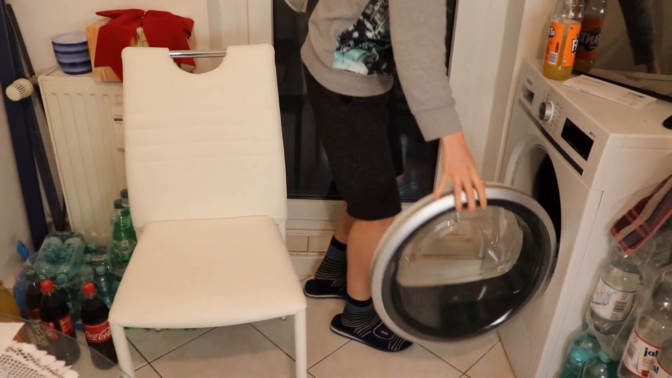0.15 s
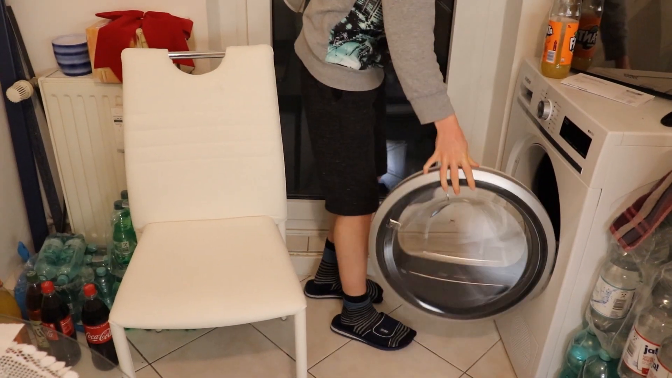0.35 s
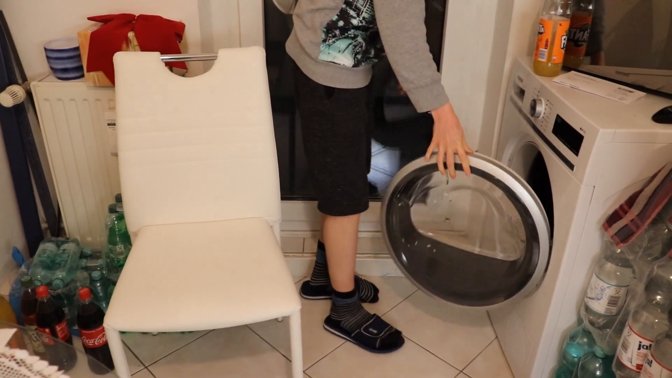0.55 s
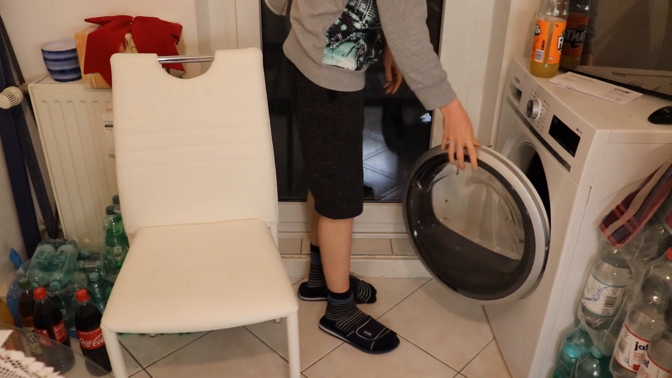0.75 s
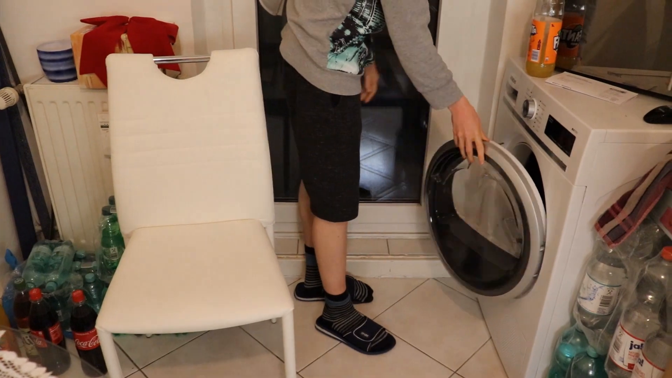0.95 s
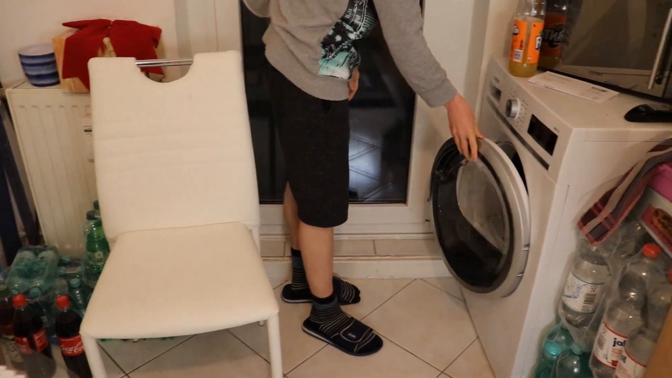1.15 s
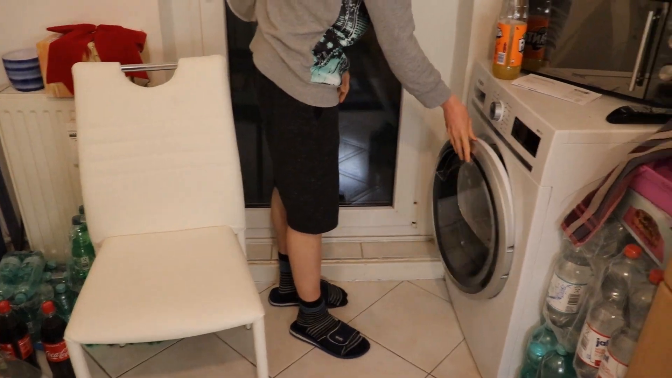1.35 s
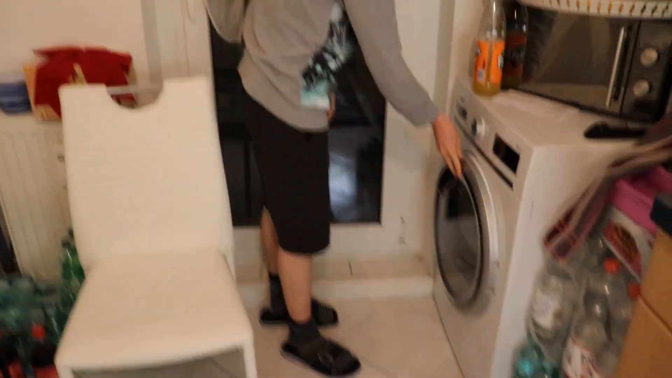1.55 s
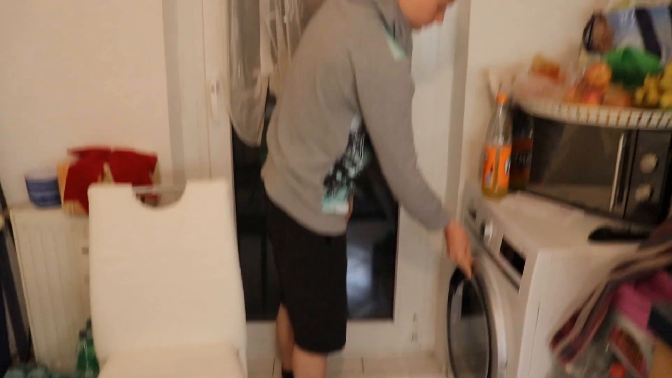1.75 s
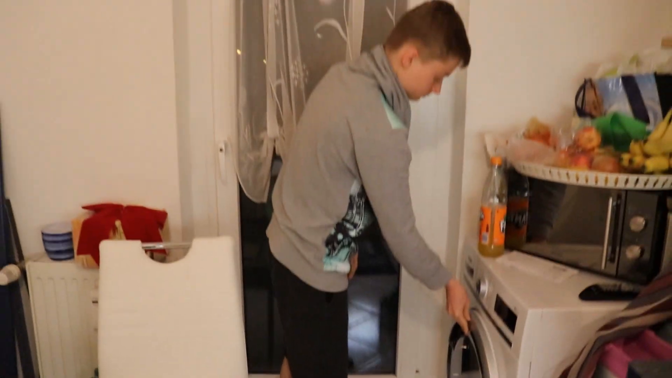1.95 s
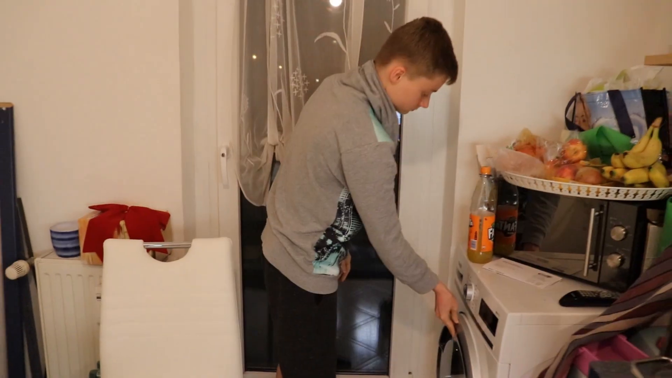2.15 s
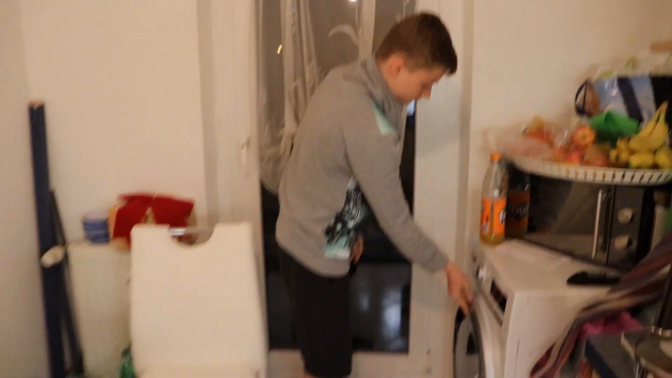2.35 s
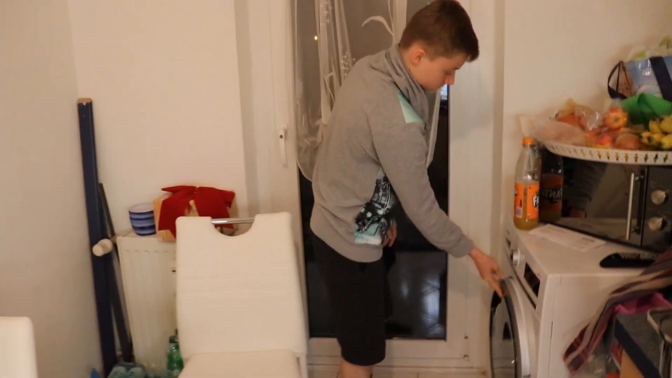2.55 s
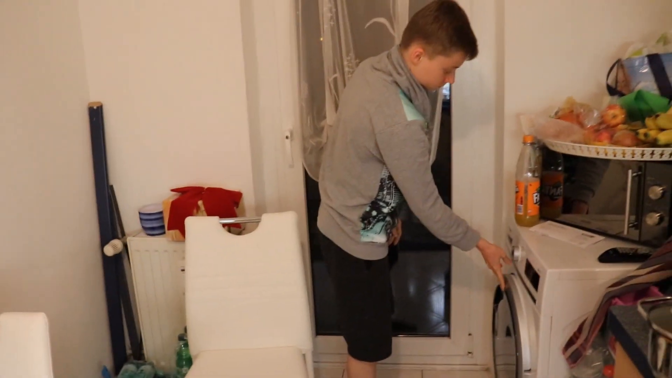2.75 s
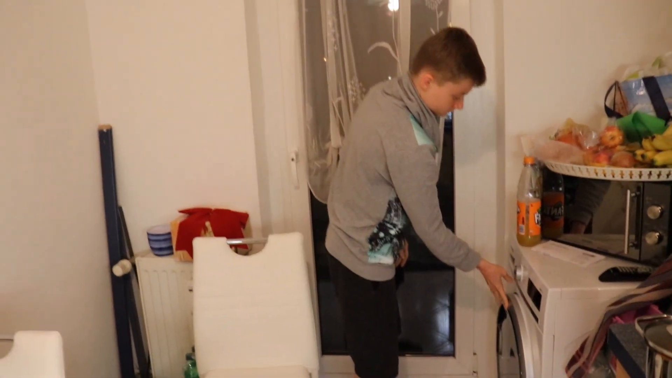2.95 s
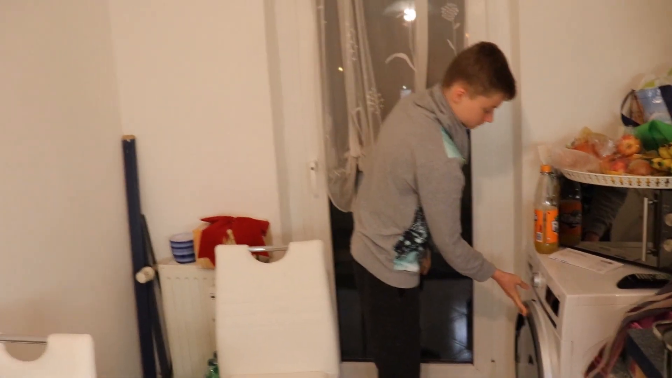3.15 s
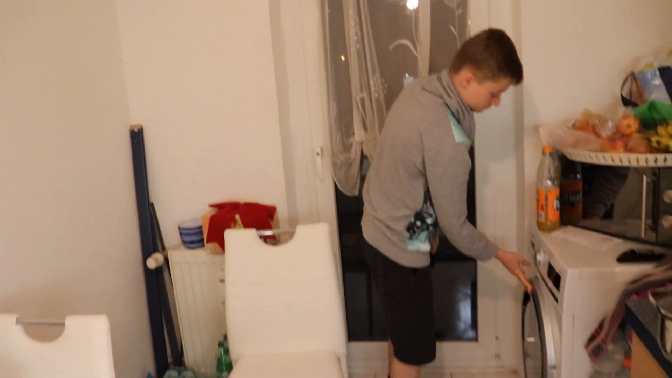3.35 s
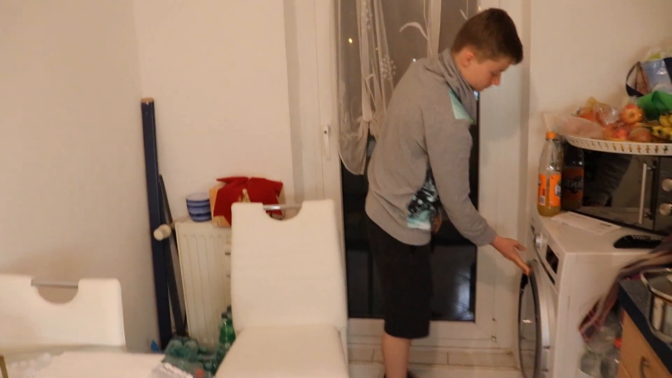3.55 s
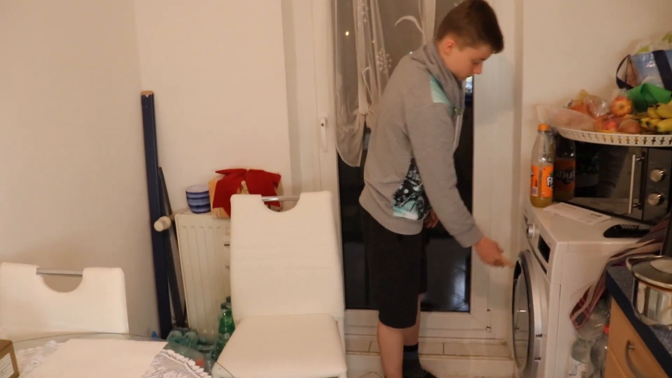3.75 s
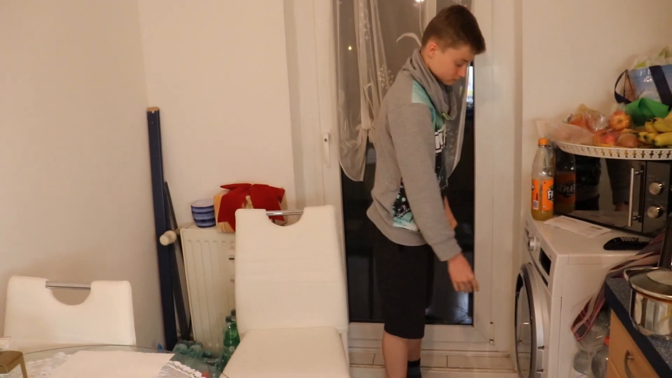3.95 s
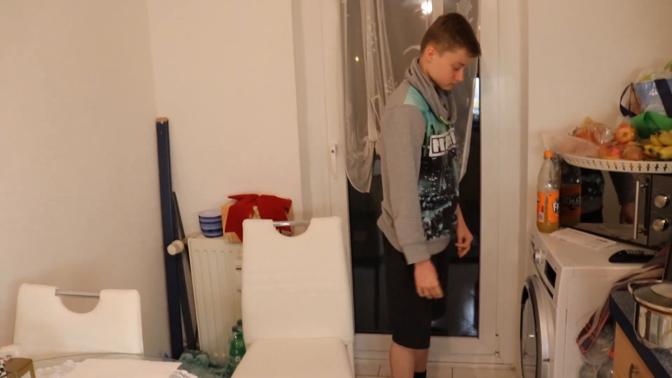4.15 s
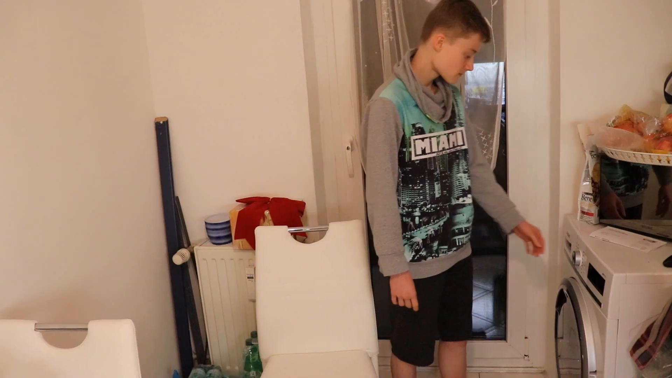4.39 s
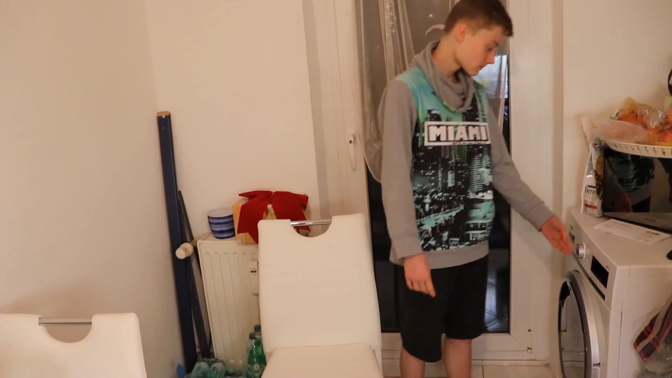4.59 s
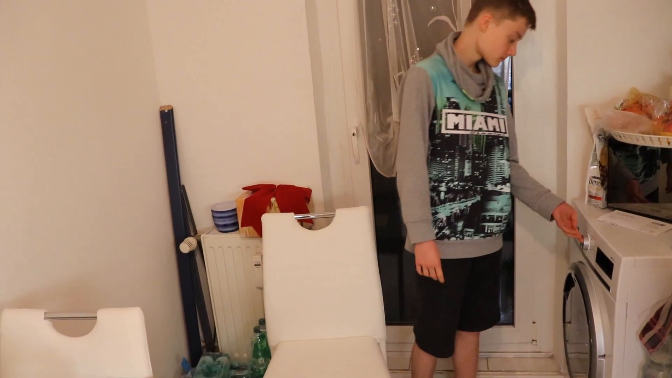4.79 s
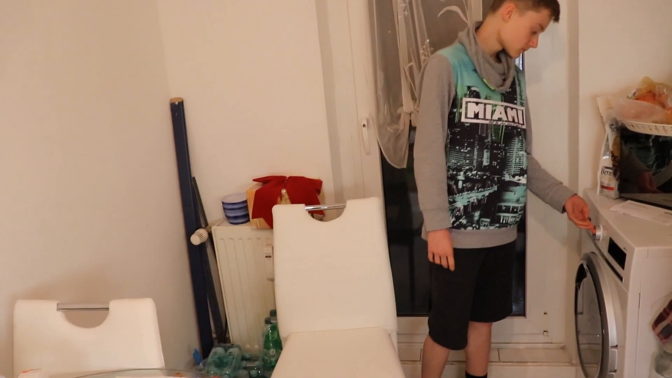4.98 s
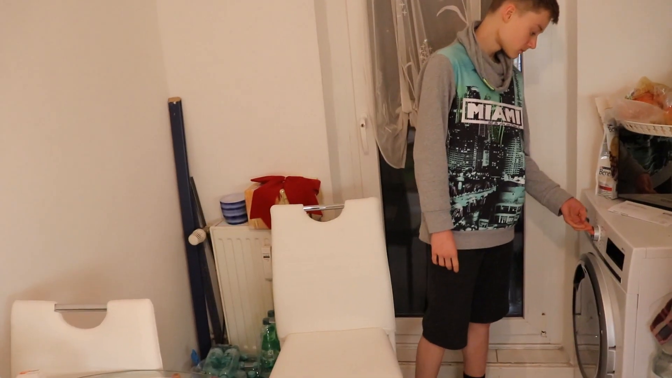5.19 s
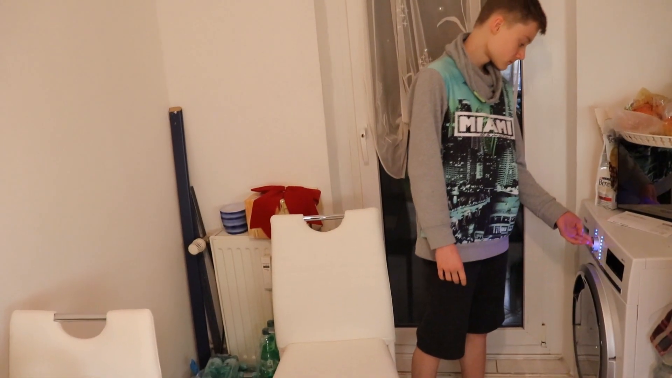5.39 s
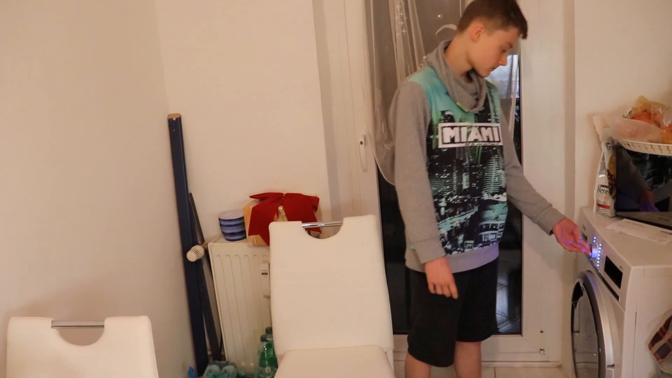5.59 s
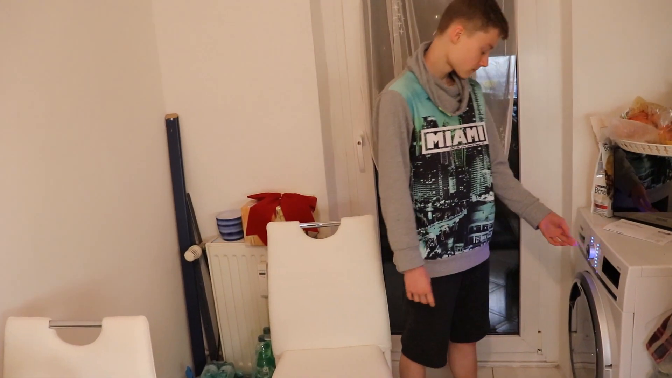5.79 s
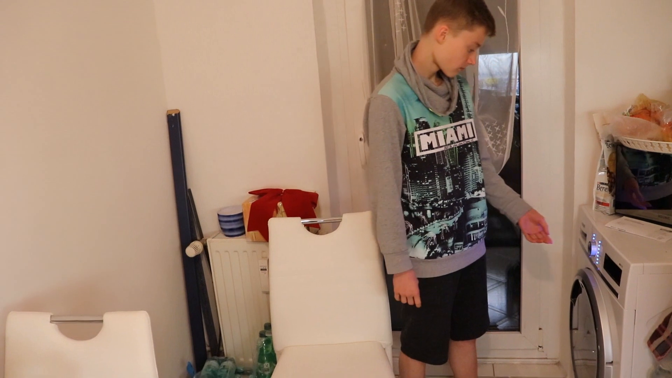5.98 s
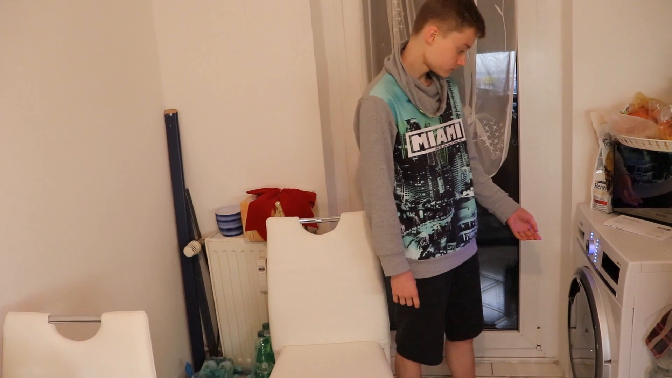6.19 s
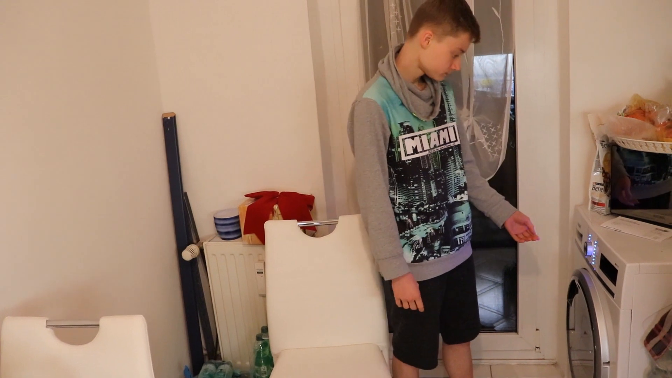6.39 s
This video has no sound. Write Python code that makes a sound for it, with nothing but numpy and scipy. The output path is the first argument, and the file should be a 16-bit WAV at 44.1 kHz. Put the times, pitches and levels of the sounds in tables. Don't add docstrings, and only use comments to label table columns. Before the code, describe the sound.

Slippers scuff, a heavy appliance door booms, then latches with a sharp metallic slam and rattle; footsteps and plastic dial clicks follow over fridge hum.

```python
import sys
import numpy as np
from scipy import signal
from scipy.fft import rfft, irfft, next_fast_len
from scipy.io import wavfile
from scipy.ndimage import uniform_filter1d, map_coordinates

SR = 44100
rng = np.random.default_rng(int(sys.argv[2]) if len(sys.argv) > 2 else 0)


def put_to_file(sound):
    columns = np.atleast_2d(sound).T
    safe = np.clip(columns, -1, 1)
    whole_steps = np.round(safe * 32767)
    wavfile.write(sys.argv[1], SR, whole_steps.astype(np.int16))


def elevation(decibels):
    levels = np.asarray(decibels, float)
    return 10 ** (levels / 20)


N = 283254

# [t/s, level/dB]
FRIDGE = [(0, -75), (.8, -67), (1.7, -66), (2.3, -60.5), (3.4, -51), (4.0, -50), (4.4, -52), (5.2, -54),
          (6.42, -54)]
# [multiple of shaft speed, level/dB rms]
ORDERS = [(3, -76.5), (4, -69), (6, -70), (7, -80.5), (8, -67.5), (9, -63.5), (10, -77.5), (11, -82.5)]
# [f/Hz, level/dB per Hz]
AIR = [(20, -33), (60, -15), (120, -6.5), (170, -7.5), (384, -7.5), (531, -8.5), (796, -12.5),
       (1600, -14.5), (3250, -17.5), (11000, -28.5), (14800, -30), (16200, -30.5)]
# [t/s, level/dB]
AIR_LEVEL = [(0, -55.5), (1.6, -59.5), (2.3, -53.5), (3.1, -61), (4.0, -58), (6.42, -59.5)]
# [f/Hz, likeness]
ALIKE = [(60, 0.94), (200, 0.94), (400, 0.8), (750, 0.65), (1400, 0.3), (3000, 0.029)]
# [f/Hz, t60/s]
KITCHEN = [(60, 0.86), (300, 0.49), (1500, 0.55), (4000, 0.37), (8000, 0.52), (14000, 0.21)]

# [t/s at full strength, held/s, level/dB]
SCUFF = [(0.0, 0.021, -46), (.1, 0.048, -56.5), (.3, 0.039, -51), (.656, 0.09, -44), (1.674, 0.034, -52),
         (2.905, 0.061, -46), (4.896, 0.0076, -47.5), (5.05, 0.049, -54.5), (5.186, 0.0067, -43.5)]
RUB = [(2.22, 0.013, -49.5), (2.42, 0.15, -54.5), (2.69, .02, -52.5), (3.12, 0.11, -58.5),
       (3.335, 0.091, -56), (3.455, 0.0044, -42.5)]
CHATTER = [
    (3.47, .005, -24),
    (3.58, 0.081, -33),
]

# [t/s, strength/dB, weight on the body/dB, hardness of the edge/dB]
CRACK = [
    (.2505, -30, -39, -3),
]
STEPS = [
    (0.35, -32.5, -23, -14),
    (1.184, -38.5, -15, -24),
    (1.229, -46, -2, -24),
    (4.49, -27.5, -0.5, -21.5),
    (4.515, -39.5, 7.5, -10),
    (4.601, -34.5, -5, -20),
    (4.628, -37, -1, -22),
    (4.883, -35.5, -12, -27),
]
DOOR = [
    (1.76, -18, -10, -13),
    (1.765, -10.5, -8.5, -17),
    (1.776, -7.5, -10, -24),
    (1.796, -13.5, -4.5, -14.5),
    (1.812, -11, -13, -23),
    (1.849, -21, -13, -38),
]
REBOUNDS = [
    (1.914, -33, 8, -5.5),
    (1.93, -46, 20, -7),
    (1.948, -42, 16, -3),
    (2.003, -50, 6, -10),
    (2.027, -54, 15, -15),
    (2.075, -57.5, 10.5, -3),
]
HAND = [(2.135, -39.5, -17, -8), (2.2, -26.5, -18.5, -9), (2.256, -29, -20, -10.5),
        (2.353, -29.5, -24.5, -11.5), (2.442, -36, -24, -10), (2.634, -35.5, -12.5, -40),
        (2.671, -30.5, -16.5, -18), (2.753, -31.5, -10, -8.5), (2.789, -49, 4, 2), (3.066, -35, -20, -14),
        (3.169, -43.5, -1.5, -15), (3.327, -31, -15.5, -9), (3.415, -39, -4.5, -3)]
SHOVE = [
    (3.405, -50, 12, -21),
]
LATCH = [
    (3.4576, 0, -33, -7),
    (3.461, -2.5, -19.5, -10),
    (3.478, -9.5, -9, -14.5),
    (3.509, -36.5, 11.5, -3),
    (3.569, -32, 9.5, -22),
    (3.758, -34, -9, -13.5),
    (3.839, -35, -11, -11),
    (3.915, -41, 0, -17),
    (4.0, -47, -1.5, -21),
]
TICKS = [
    (4.429, -53, 3, -14),
    (5.5985, -41, 0.5, 1.5),
]
LEANS = [
    (4.82, -43, -12.5, -25),
    (5.4, -46.5, -4.5, -23),
    (5.5, -57.5, 5.5, -25),
    (5.62, -63, 3, -28),
]
DIAL = [
    (4.996, -36, -18.5, -30),
    (5.043, -33.5, -13.5, -30),
    (5.147, -28.5, -19.5, -15),
    (5.169, -27.5, -18.5, -30),
    (5.189, -33, -17, -15),
    (5.761, -39.5, -6, -17),
    (5.777, -27, -22, -33),
    (5.794, -26.5, -12, -37),
    (5.839, -29, -17.5, -21),
    (5.859, -38.5, -12.5, -24),
]
NOTCHES = [
    (5.148, -46, 7, -12),
    (5.777, -45, 7, -15),
    (5.799, -41.5, 9, -20),
]

# [f/Hz, width/Hz, level/dB]
LIP = [(1604, 260, -1), (2015, 260, 4.5)]
BUTTON = [(820, 130, 6), (1950, 280, -4), (3620, 500, -5.5)]
TILES = [(205, 65, -2.5), (358, 79, 1), (507, 114, -2.5), (658, 94, -2)]
CABINET = [(52, 19, -12), (87.5, 22, -11.5), (134.7, 20, -4), (185, 8.3, 2), (235.7, 12.5, 3.5),
           (351, 25, 3), (406, 41, -2), (627, 36, 9), (713, 28, 4.5), (990, 40, -3)]
PANELS = [(92, 13, -10.5), (140, 4.8, -2.5), (234, 14.8, 0), (353, 14.4, -1), (521, 36, -7.5)]
DRUM = [(46, 4, -0.5), (70.2, 10.7, -7.5), (96, 9.3, 1.5), (134.8, 12.6, -1.5), (179, 6, 4),
        (211.2, 12.4, 4), (268.6, 18.8, -5), (301.6, 6.4, 1), (366.6, 21.5, 4.5), (651, 105, -3),
        (760, 220, -3.5)]
FASCIA = [(97.6, 24, -5), (136, 104, -7.5), (200, 52, 0), (332, 165, -4.5)]
SPRING = [(1170, 44, -5), (1312, 40, 0.5), (1520, 63, -8)]

# [f/Hz, level/dB per Hz]
SLIDE = [(530, -51), (900, -15), (1040, -15), (1460, -5), (4050, -3.5), (7680, -11), (11700, -18.5),
         (14500, -16), (16000, -32.5)]
RUBBER = [(180, -64.5), (300, -20), (385, -11), (593, -15.5), (1840, -15.5), (2790, -19), (14000, -36.5),
          (16000, -36.5)]
SNAP = [(2500, -27), (4000, -5), (6000, -6), (9000, -8.5), (12000, -10), (14800, -7), (16200, -51.5)]
SPLINTER = [(400, -23), (750, -6), (1000, -8.5), (1400, -15), (2000, 4), (2700, -1), (3600, 3), (5500, -40),
            (8000, -32)]
SOLE = [(410, -12), (700, -5.5), (962, -11), (1700, -8.5), (2160, -12), (2360, -11.5), (3670, -11.5),
        (7000, -46), (9100, -59), (15400, -120)]
RIM = [(410, -45), (700, 0.5), (917, -5), (1120, 1), (1360, -6.5), (1710, -1), (3210, -11), (4810, -15),
       (7000, -24), (9100, -42), (15400, -120)]
SEAL = [(410, -32), (700, -6.5), (778, -4), (1220, -8.5), (1370, -9), (2040, -10.5), (2620, -8),
        (7000, -32), (9100, -45.5), (15400, -120)]
HOOK = [(410, -46.5), (700, -7), (1600, 1), (2450, -4), (3260, 0.5), (3760, -6), (4810, -11), (6140, -12.5),
        (8000, -15), (10400, -25), (17600, -120)]
CLUTTER = [(500, -9.5), (900, -12.5), (1400, -7.5), (1800, -5), (2400, -10), (3200, -16), (5000, -21.5),
           (8000, -35.5)]
KNOB = [(500, -15.5), (800, -13), (1100, -4), (1220, -7), (1330, 1), (1460, -4.5), (2300, -11.5),
        (3500, -11.5), (5000, -18.5), (8000, -29.5), (11000, -48)]

# [t/s, f/Hz, level/dB, t60/s]
SWAY = (3.5, 86.5, -38, 2.5)


def unit(x):
    return x / np.sqrt(np.mean(x ** 2) + 1e-20)


def along(points, hz):
    f, v = np.transpose(points)
    return np.interp(np.log(hz + 1), np.log(f + 1), v)


def curve(rows):
    s, value = np.transpose(rows)
    return np.interp(np.arange(N) / SR, s, value)


def wobble(rate):
    knots = rng.standard_normal(int(N * rate / SR) + 4)
    return map_coordinates(knots, [np.arange(N) * rate / SR])


def filtered(x, response):
    n = x.shape[-1]
    m = next_fast_len(n + SR // 10)
    return irfft(rfft(x, m) * response(np.fft.rfftfreq(m, 1 / SR)), m)[..., :n]


def coloured(x, spectrum):
    return filtered(x, lambda hz: elevation(along(spectrum, hz)))


def resonances(peaks):
    def response(f):
        total = 0
        for k, (centre, width, db) in enumerate(peaks):
            damping = 1j * f * width
            total = total + (-1) ** k * elevation(db) * damping / (centre * centre - f * f + damping)
        return total
    return response


def spread(pair):
    def mid_side(hz):
        turn = np.arccos(np.clip(along(ALIKE, hz), -1, 1)) / 2
        return np.array([np.cos(turn), np.sin(turn)])
    mid, side = filtered(pair, mid_side)
    return np.array([mid + side, mid - side])


def rush(spectrum, patchy_db):
    z = signal.stft(rng.standard_normal((2, N)), nperseg=512)[2]
    field = uniform_filter1d(rng.standard_normal(z.shape[1:]), 6, 0)
    field = uniform_filter1d(field, 10, 1)
    pair = signal.istft(z * elevation(patchy_db * unit(field)), nperseg=512)[1][:, :N]
    return unit(spread(coloured(pair, spectrum)))


def strokes(rows, rise, fall):
    t = np.arange(N) / SR
    gain = 0
    for s, held, db in rows:
        before = np.clip(s - t, 0, None)
        after = np.clip(t - s - abs(held), 0, None)
        gain = gain + elevation(db - rise * before - fall * after)
    return gain


def kitchen(x):
    hz, t, z = signal.stft(rng.standard_normal((2, 3 * SR // 4)), SR, nperseg=256)
    decay = elevation(-60 * t / along(KITCHEN, hz)[:, None])
    tail = spread(signal.istft(z * decay, SR, nperseg=256)[1])
    return signal.fftconvolve(x[None], tail / np.linalg.norm(tail[0]), axes=1)


def arrive(x, right_db, lead_s):
    def left_right(hz):
        tilt = elevation(right_db * (hz / 16000) ** 3) * np.exp(1j * np.pi * hz * lead_s)
        return np.array([1 / tilt, tilt])
    return filtered(x, left_right)


def peak(x):
    return x / np.abs(x).max()


def contacts(events, body, part, contact_s, lingers, boom_room_db, room_db, edge_room_db,
             right_db, lead_s, rise):
    out = np.zeros((2, N + 2 * SR))
    t = np.arange(SR // 2) / SR
    short = t[:SR // 8]
    push = peak(filtered(t / rise * np.exp(-t / rise), resonances(body)))
    blow = 1.0 * (np.arange(len(t)) == 350)
    part_blow = coloured(blow, part)
    edge_blow = coloured(blow, SNAP)
    energy = np.linalg.norm
    hardest_db = max(row[1] for row in events)
    usual_db = np.mean([row[1] for row in events])
    for s, strength_db, weight_db, hardness_db in events:
        contact = np.clip(contact_s * elevation(lingers * (usual_db - strength_db)), .001, .08)
        swell_s = rise * elevation(.5 * (hardest_db - strength_db))
        envelope = elevation(-20 * short / contact) * (1 - np.exp(-short / swell_s))
        rattle = rng.standard_normal((2, 2, len(short))) * envelope
        boom = elevation(strength_db + weight_db + 5.5) * push
        knock = elevation(strength_db) * peak(coloured(rattle[0], part))
        click = elevation(strength_db + hardness_db + 5.5) * peak(coloured(rattle[1], SNAP))
        around = elevation(room_db) * energy(knock[0]) / energy(part_blow) * part_blow
        around += elevation(edge_room_db) * energy(click[0]) / energy(edge_blow) * edge_blow
        tail = kitchen(elevation(boom_room_db) * boom + around)
        heard = out[:, round(s * SR):]
        heard[:, :len(t)] += boom
        heard[:, :len(short)] += arrive(spread(knock + click), right_db, lead_s)
        heard[:, :tail.shape[1]] += tail
    return out[:, :N]


def fridge():
    shaft_hz = 49.5 * (1 + 0.00219 * wobble(2.87))
    turn = 2 * np.pi * np.cumsum(shaft_hz) / SR
    hum = elevation(curve(FRIDGE) + .6 * wobble(4)) * np.sin(turn)
    hum = hum + elevation(-60 + 1.2 * wobble(4)) * np.sin(2 * turn)
    for k, db in ORDERS:
        hum = hum + elevation(db + 1.1 * wobble(3)) * np.sin(k * turn + k * k)
    air = elevation(curve(AIR_LEVEL) + 4.5) * rush(AIR, patchy_db=.4)
    return np.sqrt(2) * hum + air


def friction():
    scuff = elevation(.9 * wobble(60)) * rush(SLIDE, patchy_db=.8)
    rubbing = elevation(2.5 * wobble(45)) * rush(RUBBER, patchy_db=1.2)
    rubbing = rubbing + filtered(rubbing, resonances(LIP))
    scuffs = strokes(SCUFF, rise=220, fall=155) * scuff
    return scuffs + elevation(5.5) * strokes(RUB, rise=176, fall=180) * rubbing


def crack():
    return contacts(CRACK, TILES, SPLINTER, contact_s=0.055, lingers=0, boom_room_db=-11, room_db=-18,
                    edge_room_db=-11, right_db=2.0, lead_s=.00003, rise=0.00026)


def slippers():
    return contacts(STEPS, TILES, SOLE, contact_s=0.016, lingers=-0.37, boom_room_db=-2.0, room_db=-2.5,
                    edge_room_db=4, right_db=4.0, lead_s=.00003, rise=0.00028)


def door():
    blows = contacts(DOOR, CABINET, RIM, contact_s=0.026, lingers=-0.13, boom_room_db=-4.0, room_db=-3,
                     edge_room_db=-10.5, right_db=3, lead_s=.00005, rise=0.00065)
    rebounds = contacts(REBOUNDS, CABINET[:7], RIM, contact_s=0.017, lingers=-.1, boom_room_db=-7.5,
                        room_db=-2.0, edge_room_db=-7, right_db=7, lead_s=.00005, rise=0.00073)
    return blows + rebounds


def hand():
    fumbling = contacts(HAND, PANELS, SEAL, contact_s=0.045, lingers=-0.27, boom_room_db=0, room_db=-4.5,
                        edge_room_db=-12, right_db=3, lead_s=.00005, rise=0.00038)
    shove = contacts(SHOVE, DRUM[:5], SEAL, contact_s=.03, lingers=0, boom_room_db=-5, room_db=-5.5,
                     edge_room_db=-12, right_db=2.5, lead_s=.00005, rise=0.002)
    return fumbling + shove


def latch():
    return contacts(LATCH, DRUM, HOOK, contact_s=0.051, lingers=0.49, boom_room_db=1.0, room_db=-8.5,
                    edge_room_db=-13, right_db=16.0, lead_s=.00005, rise=0.00026)


def clutter():
    started = np.arange(N) / SR > 3.468
    shaking = started * strokes(CHATTER, rise=55, fall=100)
    return shaking * elevation(0.44 * wobble(70)) * rush(CLUTTER, patchy_db=2.0)


def drum():
    s, hz, db, t60 = SWAY
    t = np.clip(np.arange(N) / SR - s, 0, None)
    return elevation(db - 60 * t / t60) * np.sin(2 * np.pi * hz * t) * (1 - np.exp(-t / .015))


def ticks():
    return contacts(TICKS, BUTTON, SPLINTER, contact_s=0.005, lingers=.1, boom_room_db=-18, room_db=-22,
                    edge_room_db=-13, right_db=1.5, lead_s=.00003, rise=0.00004)


def leans():
    return contacts(LEANS, FASCIA, SOLE, contact_s=.04, lingers=0, boom_room_db=2.5, room_db=2,
                    edge_room_db=-6, right_db=3, lead_s=.00003, rise=0.0014)


def dial():
    detents = contacts(DIAL, FASCIA, KNOB, contact_s=0.067, lingers=.15, boom_room_db=1, room_db=-5,
                       edge_room_db=-18.5, right_db=6, lead_s=.00005, rise=0.0011)
    notches = contacts(NOTCHES, SPRING, KNOB, contact_s=.012, lingers=0, boom_room_db=-4, room_db=-5,
                       edge_room_db=-15, right_db=5.5, lead_s=.00005, rise=0.00012)
    return detents + notches


def scene():
    background = fridge() + friction()
    machine = crack() + slippers() + door() + hand() + latch()
    aftermath = clutter() + drum() + ticks() + leans() + dial()
    return background + machine + aftermath


def low_pass(x):
    return signal.sosfilt(signal.butter(12, 16180, fs=SR, output="sos"), x)


def record(dry):
    clipped = dry / (1 + np.abs(dry / 1.15) ** 6) ** (1 / 6)
    return low_pass(clipped)


dry = scene()
out = record(dry)
put_to_file(out)
```